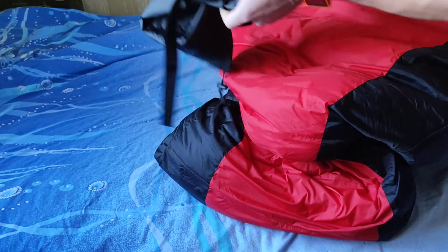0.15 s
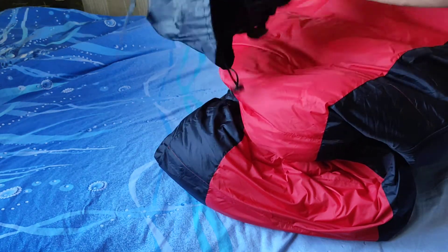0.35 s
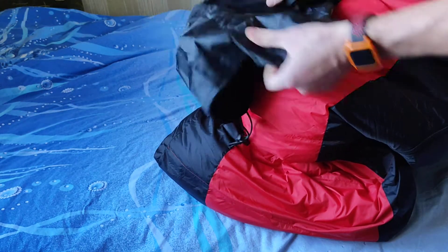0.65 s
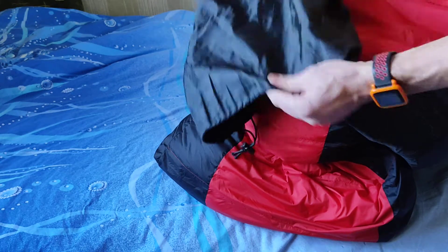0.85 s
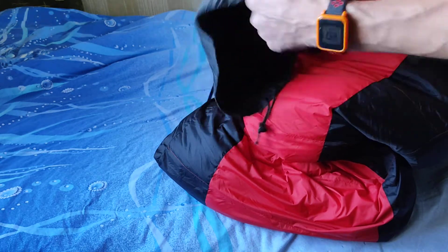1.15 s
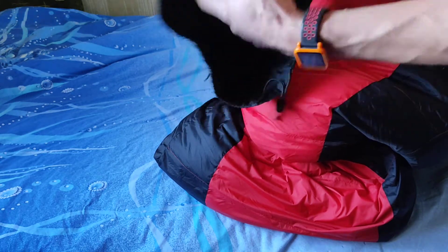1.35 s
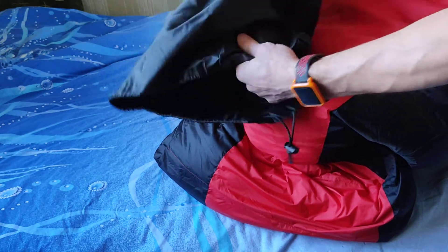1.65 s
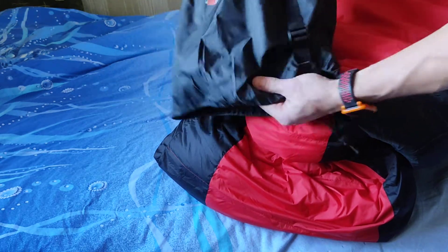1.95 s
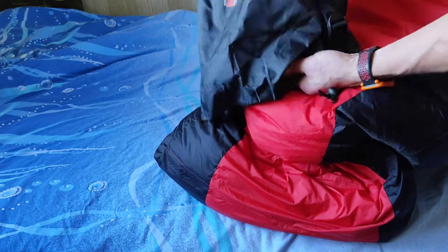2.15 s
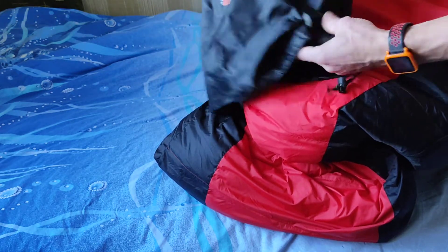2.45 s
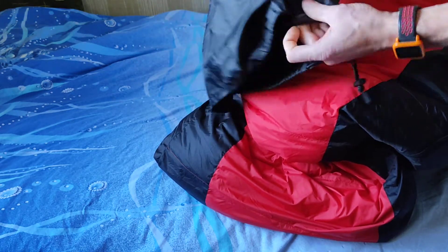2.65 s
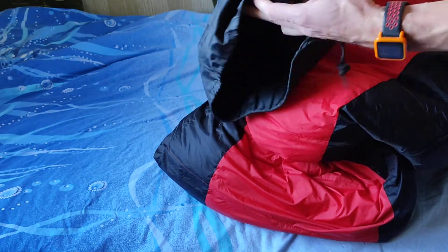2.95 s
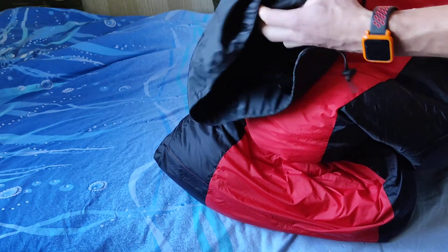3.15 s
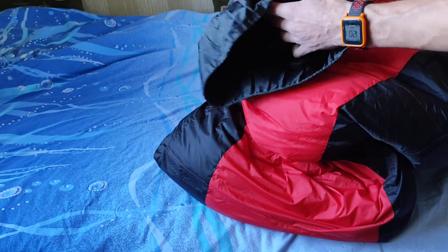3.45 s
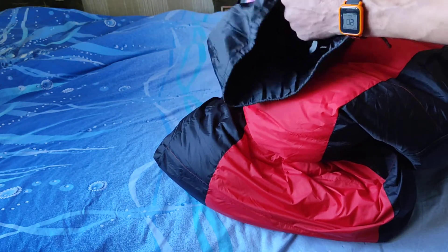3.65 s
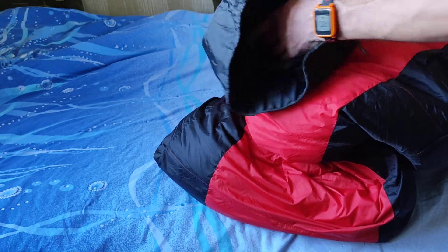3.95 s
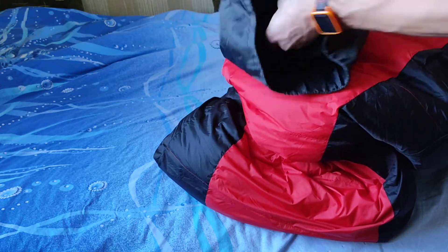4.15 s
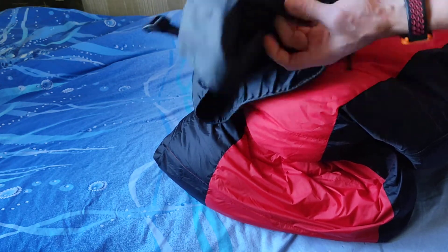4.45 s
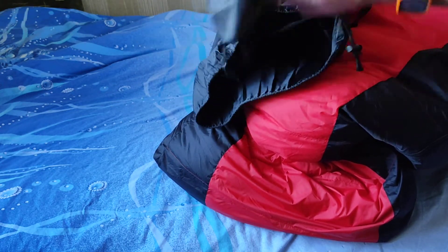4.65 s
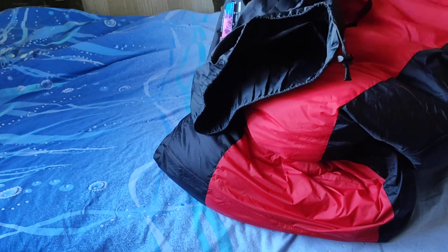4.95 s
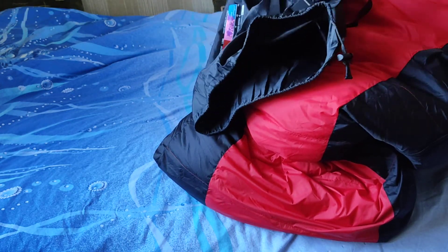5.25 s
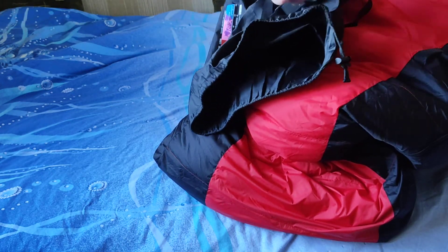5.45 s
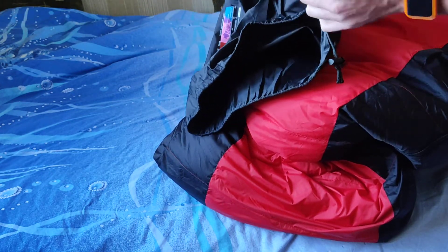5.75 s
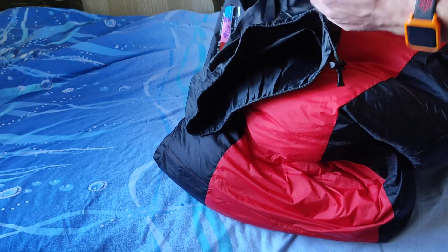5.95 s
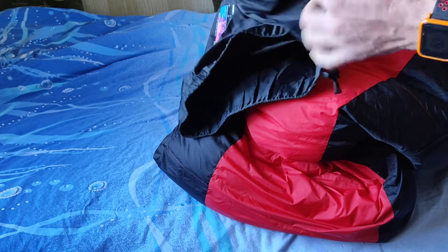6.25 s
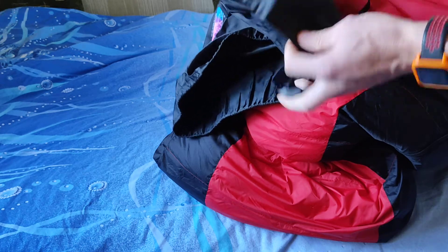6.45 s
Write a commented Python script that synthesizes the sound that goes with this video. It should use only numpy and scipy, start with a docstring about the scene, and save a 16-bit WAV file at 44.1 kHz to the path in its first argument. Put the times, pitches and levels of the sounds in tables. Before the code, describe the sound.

A nylon sack rustles and crinkles irregularly as hands turn and open it, with a few sharp swishes and snaps.

```python
"""A nylon sack rustles as hands turn and open it over a sleeping bag on a bed, near a two-port microphone.
Stick-slip friction makes the weave hiss, scrape and rip; creases buckle and crackle, slack panels flap,
and strained folds snap with a tick and a dull pop. The microphone port resonates near 8 kHz.
The soft room answers briefly, over faint air noise and a low rumble."""
import sys
import numpy as np
from scipy import signal
from scipy.fft import rfft, irfft, next_fast_len
from scipy.io import wavfile
from scipy.ndimage import uniform_filter1d

SR = 44100
rng = np.random.default_rng(int(sys.argv[2]) if len(sys.argv) > 2 else 0)


def generate_wav(signal):
    """Clip the signal to [-1, 1] and save it as 16-bit WAV at the path in sys.argv[1]."""
    frames = np.transpose(np.atleast_2d(signal))
    scaled = np.clip(frames, -1, 1) * 32767
    pcm = np.round(scaled).astype(np.int16)
    wavfile.write(sys.argv[1], SR, pcm)


N = 291060


def amp(db):
    return 10 ** (np.asarray(db) / 20)


def unit_rms(x):
    return x / np.sqrt(np.mean(x ** 2) + 1e-20)


def pan(left_minus_right_db):
    """Stereo level difference, split equally between the channels."""
    return amp(left_minus_right_db * np.array([[.5], [-.5]]))


def at_frequency(points, hz):
    knots_hz, values = np.transpose(points)
    return np.interp(np.log(hz + 1), np.log(knots_hz + 1), values)


def over_time(points):
    return np.interp(np.arange(N) / SR, *np.transpose(points))


def add_at(out, start_s, sound):
    span = out[:, round(start_s * SR):][:, :sound.shape[1]]
    span += sound[:, :span.shape[1]]


def colour(x, spectrum):
    """Minimum-phase filtering: the response is causal, so clicks ring after they land."""
    log_gain = np.log(amp(at_frequency(spectrum, abs(np.fft.fftfreq(8192, 1 / SR)))))
    taps = np.fft.ifft(np.exp(np.conj(signal.hilbert(log_gain)))).real[:4096]
    return signal.oaconvolve(x, taps[None], axes=1)[:, :N]


# Likeness of the two ports: (frequency [Hz], correlation [0-1])
PORT_CORRELATION = [(25, 0.16), (60, 0.35), (150, 0.97), (380, 0.93), (950, 0.62), (2380, 0.59),
                    (5980, 0.019), (15000, 0.0033)]
# Imbalance of the ports: (frequency [Hz], left minus right [dB])
PORT_BALANCE = [(60, -0.5), (180, 9), (550, 6.5), (1650, 4), (4200, 2), (6400, 1), (7400, -2.5),
                (8600, 6.5), (10000, 4), (15000, 2)]
def microphone_ports(streams):
    """Partial coherence: the ports agree most in the upper bass; in the treble each hears its own stream."""
    size = next_fast_len(N)
    hz = np.fft.rfftfreq(size, 1 / SR)
    correlation = np.clip(at_frequency(PORT_CORRELATION, hz), 0, 1)
    left, independent = rfft(streams, size)
    right = correlation * left + np.sqrt(1 - correlation ** 2) * independent
    return irfft(np.array([left, right]) * pan(at_frequency(PORT_BALANCE, hz)), size)[:, :N]


# Spectra of room air with microphone hiss, and of the rumble: (frequency [Hz], relative level [dB])
AIR_SPECTRUM = [(50, 8), (150, -5), (400, 3), (2000, 3), (5000, -22), (7700, 1), (10000, -26), (16000, -44)]
RUMBLE_SPECTRUM = [(15, -1.5), (27, -15.5), (60, -16.5), (100, -25.5), (200, -25), (16000, -100)]
# Swell of the rumble: (time [s], level [dB])
RUMBLE_LEVELS = [(0.0, -56.5), (0.8, -57.5), (1.8, -53.5), (2.0, -58), (2.4, -55), (3.5, -56), (4.2, -58),
                 (4.4, -56), (4.65, -56.5), (5.4, -58.5), (6.0, -57), (6.25, -57), (6.43, -49), (6.6, -54)]
def background():
    """Filtered Gaussian noise: steady room air and a wavering rumble, stronger on the left."""
    air_noise, rumble_noise = rng.standard_normal((2, 2, N))
    air = unit_rms(microphone_ports(colour(air_noise, AIR_SPECTRUM)))
    rumble = unit_rms(microphone_ports(colour(rumble_noise, RUMBLE_SPECTRUM)))
    return amp(-64.5) * air + amp(over_time(RUMBLE_LEVELS)) * pan(5) * rumble


def stick_slip(per_s, spread_db, hiss, clump_db, clump_s):
    """Stick-slip friction: uneven impulses over a hiss, in clumps; two uncorrelated streams of one motion."""
    chance, size, clumps = rng.random(N), rng.exponential(1, N), rng.standard_normal(N)
    sign, smooth = rng.standard_normal((2, 2, N))
    jumps = unit_rms((chance < per_s / SR) * amp(spread_db * np.minimum(size, 5)) * np.sign(sign))
    width = int(clump_s * SR)
    clumps = unit_rms(uniform_filter1d(uniform_filter1d(clumps, width), width))
    return (hiss * smooth + np.sqrt(1 - hiss ** 2) * jumps) * amp(clump_db * clumps)


def cloth_texture(spectrum, patch_db, **friction):
    """Spectral modulation: parts of the cloth sound in turn, so patches of the spectrum come and go."""
    bins = signal.stft(colour(stick_slip(**friction), spectrum), nperseg=512)[2]
    patches = uniform_filter1d(rng.standard_normal(bins.shape[1:]), 6, axis=0)
    patches = unit_rms(uniform_filter1d(patches, 8, axis=1))
    return unit_rms(signal.istft(bins * amp(patch_db * patches), nperseg=512)[1][:, :N])


# Pulls of the hands: (peak time [s], weave level [dB], crease level [dB], 10 dB rise [ms], 10 dB fall [ms])
HAND_PULLS = [(0.06, -34.5, -43.5, 118, 121), (0.251, -38.5, -49.5, 58, 52), (0.496, -36.5, -47.5, 155, 66),
              (0.604, -36, -50.5, 56, 92.0), (0.672, -42.5, -48, 31, 119.0), (0.768, -32, -65, 35, 26),
              (0.881, -27.5, -40.5, 141, 46), (1.057, -35.5, -49, 131, 119), (1.152, -36, -49, 7, 30),
              (1.178, -36.5, -43, 18, 119), (1.466, -39, -49, 293, 182), (1.762, -44, -49, 296.0, 128.0),
              (1.815, -26.5, -37, 115, 125), (2.178, -39.5, -47.5, 238, 133), (2.4, -48, -63, 108, 5),
              (2.535, -40, -57, 127.0, 56.0), (2.646, -38, -52.5, 26, 25), (2.775, -45.0, -51.5, 162.0, 94),
              (2.929, -38, -48, 134, 44), (3.054, -38, -54.5, 72, 63), (3.16, -40, -53, 50, 32),
              (3.25, -34.0, -67.0, 73, 43), (3.342, -35, -48.5, 44, 177.0), (3.44, -32.5, -48.5, 42, 203),
              (3.582, -34, -54, 21, 13), (3.694, -30, -46, 43, 44), (3.859, -33.5, -46, 114, 66),
              (3.988, -29.5, -60, 41, 76), (4.175, -33, -50.5, 128, 9), (4.23, -33, -54, 71, 95.0),
              (4.284, -35, -45, 27, 131), (4.435, -34.5, -47, 56, 44), (4.542, -38, -68, 2, 31),
              (4.667, -41.5, -53, 126, 70), (4.774, -40.5, -54.5, 6, 70), (4.881, -39.5, -58, 29, 50),
              (4.952, -41, -61, 3, 126), (5.085, -41.5, -52, 40, 0), (5.108, -30, -48.5, 15, 44),
              (5.19, -44, -65, 3, 28), (5.275, -45, -69, 56, 36), (5.335, -42, -69, 57, 28),
              (5.447, -39.5, -49.5, 90.0, 28), (5.513, -40, -46.5, 68, 43), (5.599, -41.5, -61, 69, 69),
              (5.729, -41, -54.5, 96.0, 59), (5.777, -44, -74, 18, 227), (6.005, -37.5, -46.5, 36, 18),
              (6.07, -29.5, -34.5, 50, 33), (6.22, -45.5, -56, 101, 196.0),
              (6.545, -40.5, -74, 121.5, 69.0)]
# Slack cloth folding over:
# (peak time [s], crease level [dB], fold level [dB], panel level [dB], 10 dB half-width [ms])
SLACK_FLAPS = [(0.01, -44, -51, -53, 30), (0.07, -43, -43, -52, 28), (0.205, -50.5, -54, -53, 33),
               (0.481, -70.0, -52, -46.5, 26), (0.563, -47, -55, -51.5, 33), (0.673, -44.5, -45, -46.5, 36),
               (0.801, -38.5, -44, -41.5, 49), (1.029, -50, -50, -52, 18), (1.188, -39.5, -43, -40, 22),
               (1.228, -39.5, -54, -43, 17), (1.343, -68, -62, -65, 41), (1.44, -51, -47, -48, 18),
               (1.64, -49.5, -45.5, -46.5, 96), (1.745, -35, -39, -45, 28), (1.807, -33.5, -31.5, -47, 16),
               (1.87, -39, -43, -44, 22), (2.226, -53, -50.5, -52.5, 91), (2.378, -48.5, -57, -59, 44),
               (2.507, -45.5, -50.5, -51.5, 91), (2.905, -46, -70.0, -60, 59), (3.109, -56, -51, -50.5, 27),
               (3.246, -46.5, -50, -54, 68), (3.52, -42.5, -77, -53.5, 75), (3.609, -60, -51.5, -63, 97.0),
               (3.704, -39, -51.5, -50, 48), (3.929, -45.5, -46.5, -56, 26), (4.038, -42, -45, -51.5, 91),
               (4.168, -45, -46, -58, 45), (4.255, -40.5, -48, -70.0, 44), (4.55, -47, -66, -72, 5.5),
               (4.697, -47, -59, -56, 55), (4.817, -51, -55, -58, 20), (4.887, -51, -52.5, -56, 46),
               (5.002, -49.5, -54.5, -54.5, 57), (5.1, -64, -51.5, -61, 64), (5.277, -51.5, -56.5, -56, 34),
               (5.338, -47, -50, -60, 24), (5.446, -44, -78, -74, 41), (5.63, -46.5, -51, -59, 62),
               (5.884, -50.5, -54.5, -62, 147), (6.04, -52, -49, -40, 9), (6.08, -49, -46, -40.5, 18),
               (6.267, -59, -48, -57.5, 16), (6.468, -59.5, -60.5, -60, 115), (6.577, -63, -53, -56, 39)]
def cloth_envelopes():
    """Incoherent addition: pulls and flaps sum in power to drive the weave, creases, folds and panels."""
    ms = np.arange(0, N + 64, 64) * 1000 / SR
    peak_s, *pull_levels, rise_ms, fall_ms = np.transpose(HAND_PULLS)[:, :, None]
    lag_ms = ms - 1000 * peak_s
    slope_ms = np.maximum(np.where(lag_ms < 0, rise_ms, fall_ms), 2)
    pull = amp(-10 * (abs(lag_ms) / slope_ms) ** 1.24)  # exponent: 1 is pointed, 2 is round
    weave, pulled = (np.sum((amp(db) * pull) ** 2, axis=0) for db in pull_levels)
    peak_s, *flap_levels, width_ms = np.transpose(SLACK_FLAPS)[:, :, None]
    flap = amp(-10 * ((ms - 1000 * peak_s) / width_ms) ** 2)
    crease, fold, panel = (np.sum((amp(db) * flap) ** 2, axis=0) for db in flap_levels)
    # Pulled creases carry the folds and panels along.
    powers = weave, crease + pulled, fold + pulled * amp(-1) ** 2, panel + pulled * amp(-7) ** 2
    return [np.interp(np.arange(N) * 1000 / SR, ms, np.sqrt(power)) for power in powers]


# Spectra of sliding weave, small creases, large folds and panels: (frequency [Hz], relative level [dB])
WEAVE_SPECTRUM = [(800, -26.5), (2000, -19), (4400, -16), (6300, -12.5), (7700, -1.5), (8800, -5.5),
                  (9500, -17), (10400, -25.5), (15200, -31.5), (16300, -76)]
CREASE_SPECTRUM = [(500, -22.5), (1200, -3.5), (1800, -1.5), (2800, 0), (4500, -11), (7700, -1),
                   (10000, -41), (16000, -42)]
FOLD_SPECTRUM = [(150, -29.5), (400, -5), (650, -0.5), (1200, -1.5), (2000, -7), (4500, -21), (16000, -76)]
PANEL_SPECTRUM = [(50, -24), (110, -16), (145, -5.5), (190, -4), (230, -2), (300, -5), (420, -7),
                  (800, -18), (2000, -34), (16000, -72)]
# Where the hands work: (time [s], left minus right [dB])
HAND_POSITION = [(0.0, -3), (5.0, -2.5), (5.9, -2.5), (6.25, -2), (6.6, 2)]
def rustle():
    """Friction and buckling at four scales: the larger the moving part, the lower its spectrum."""
    textures = (
        cloth_texture(WEAVE_SPECTRUM, patch_db=2.95,
                      per_s=5000, spread_db=0.82, hiss=0.98, clump_db=0.89, clump_s=0.012),
        cloth_texture(CREASE_SPECTRUM, patch_db=2.9,
                      per_s=1000, spread_db=2.56, hiss=0.78, clump_db=1.5, clump_s=0.014),
        cloth_texture(FOLD_SPECTRUM, patch_db=1.5,
                      per_s=700, spread_db=3.6, hiss=0.8, clump_db=1.44, clump_s=0.0075),
        cloth_texture(PANEL_SPECTRUM, patch_db=1.2,
                      per_s=400, spread_db=2.0, hiss=0.85, clump_db=1.2, clump_s=0.02))
    cloth = sum(envelope * texture for envelope, texture in zip(cloth_envelopes(), textures))
    return microphone_ports(cloth) * pan(over_time(HAND_POSITION))


# A sharp tick through the resonant port: (frequency [Hz], relative level [dB])
TICK_SPECTRUM = [(800, -34), (2300, -19), (4300, -14.5), (5600, 1), (6900, 11.5), (8500, 9.5), (10500, -14),
                 (12000, -25), (14000, -18), (16000, -28)]
# Snapping folds: (time [s], tick level [dB], pop level [dB], panel frequency [Hz], left minus right [dB])
FOLD_SNAPS = [(0.031, -35.5, -24, 1460, -3), (0.213, -48, -44, 1500, 1), (0.406, -46, -34.5, 890, 4),
              (0.757, -20.5, -40, 958, -6), (1.1491, -25, -28, 1610, 0), (1.175, -27, -24, 1930, -3),
              (1.185, -38, -28, 1350, 5), (1.335, -46, -35.5, 1170, 1), (1.712, -23, -33, 417, 5),
              (1.754, -25, -28.5, 544, 1), (1.791, -23, -19, 2800, 1), (1.857, -23, -24, 2000, 1),
              (2.929, -37, -34, 2500, 3), (3.103, -45, -41, 625, 1), (3.326, -32, -33, 3400, -1.0),
              (3.7, -31, -29, 1930, -1), (3.82, -39, -34, 2970, -1.5), (4.021, -38, -38, 1080, 0),
              (4.411, -35, -39, 1110, 1), (4.538, -36, -37, 2920, 3), (4.773, -27, -42, 2860, 2),
              (4.951, -28, -35, 2120, 2), (5.001, -45, -31.5, 2470, 3), (5.096, -8, -38, 3600, -7),
              (5.106, -17, -34, 2990, -8), (5.186, -27, -48, 1290, -3), (5.324, -34, -40, 1470, -1),
              (5.427, -46, -39, 1520, -1), (5.594, -23, -28, 1760, -1), (5.7, -38, -45, 1700, 0),
              (6.0292, -30, -24.5, 2500, 2), (6.053, -40, -31, 1550, 2), (6.059, -42, -12, 1560, 3),
              (6.067, -30, -28, 2200, 0), (6.544, -40, -60, 600, 4), (6.568, -43, -43, 422, 9)]
def snaps():
    """Snap-through buckling: a fold gives way, ringing the port and a damped panel mode, then crackles."""
    out, t = np.zeros((2, N)), np.arange(2000) / SR
    lag = t - 0.0014  # the fold strains, then lets go at lag zero
    strain = np.where(lag < 0, np.exp(-(lag / 0.0006) ** 2), np.exp(-lag / 0.0008))
    ring_t60_cycles, crackle_t60_s = 13, 0.021
    for start_s, tick_db, pop_db, panel_hz, pan_db in FOLD_SNAPS:
        noise = rng.standard_normal((4, len(t)))
        release = noise[2:] * strain
        release[:, np.argmin(abs(lag))] += [2.2, 6]  # impulses for the tick and the crack
        tick = colour(release, TICK_SPECTRUM)[0, :len(t)]
        crack = colour(release, CREASE_SPECTRUM)[1, :len(t)]
        cycles = panel_hz * np.maximum(lag + 0.00042, 0)
        ring = np.sin(2 * np.pi * cycles) * np.minimum(cycles / 0.65, 1)
        ring *= amp(-60 * cycles / ring_t60_cycles)
        pop = ring / abs(ring).max() + 0.32 * crack / abs(crack).max()
        snap = amp(tick_db) * tick / abs(tick).max() + amp(pop_db) * pop
        scatter = noise[:2] * amp(-25 - 60 * t / crackle_t60_s)
        crackle = signal.fftconvolve(scatter, snap[None], axes=1)[:, :len(t)]
        add_at(out, start_s, pan(pan_db) * (snap + crackle))
    return out


def slip_envelope(t, rise_s, decay_ms):
    """Transient sliding: an exponential onset under a Gaussian decay."""
    return (1 - np.exp(-t / rise_s)) * np.exp(-(t * 1000 / decay_ms) ** 2)


# Cloth scraping on cloth:
# (time [s], level before envelope [dB], decay [ms], centre frequency [Hz], left minus right [dB])
CLOTH_SCRAPES = [(0.032, -25, 2.5, 2200, 8), (0.058, -41, 21, 690, 1), (0.068, -39.5, 20, 1490, 1),
                 (0.406, -38, 4.5, 2400, -1), (0.467, -34.5, 4.8, 600, 4), (0.475, -44.5, 16, 296, 0),
                 (0.667, -37, 10, 1600, 1), (0.688, -43, 5.5, 450, 4), (0.764, -35, 5.9, 920, 4),
                 (0.779, -32, 9, 830, 1), (0.8, -33.5, 13, 1490, 1), (0.823, -35, 12, 1990, 1),
                 (1.174, -32, 6.5, 1300, 4), (1.192, -41, 4.8, 1210, 2), (1.149, -29, 3.2, 1990, 0),
                 (1.149, -30.5, 4.5, 590, 5), (1.167, -41, 2.8, 1500, 0), (1.222, -37, 8.1, 300, 4),
                 (1.43, -45, 16, 520, 3), (1.567, -40, 11, 300, 4), (1.71, -42.5, 35, 211, 4),
                 (1.733, -44, 8.2, 400, 3), (1.794, -42, 12, 350, 2), (1.79, -28, 4.7, 1400, 0),
                 (1.812, -35, 7.6, 1200, 2), (1.824, -29, 8.4, 1980, 1), (1.859, -28, 7, 646, 0),
                 (2.189, -45.5, 30, 1210, 3), (2.521, -50, 15, 400, 2), (3.105, -37.5, 8.7, 500, 3),
                 (3.675, -43.5, 7.1, 3000, -3), (3.922, -35, 4.2, 2200, 2), (3.952, -38, 26, 5000, -2),
                 (4.145, -38.5, 42, 5840, -2), (4.138, -38.5, 17, 2880, 0), (4.255, -45, 12, 3100, 0),
                 (4.282, -38, 16, 5000, 2), (4.862, -60, 14, 1200, 5), (4.961, -37, 11, 7640, 1),
                 (4.98, -40.5, 6, 1100, 9), (5.095, -27, 4.2, 11200, -2), (5.1, -37, 12.6, 816, 1),
                 (5.103, -32, 11, 5250, -1), (5.269, -50.5, 8.8, 500, 8), (5.324, -39, 4.9, 2200, -3.5),
                 (5.423, -43.5, 44, 1800, 4), (5.7, -39.5, 9, 4500, -2), (5.93, -46, 8, 700, 9),
                 (5.972, -40, 12, 880, 7.5), (6.027, -33, 5, 2480, 0), (6.031, -25, 6.5, 750, 16),
                 (6.042, -31.5, 11, 686, 7), (6.058, -28, 4.4, 2580, -1), (6.0595, -19, 3.1, 520, 9),
                 (6.067, -33, 7.3, 2500, 4)]
def scrapes():
    """Band-limited friction noise: each brief slip has its own pitch, and random modulation adds grit."""
    out, t = np.zeros((2, N)), np.arange(3000) / SR
    half_band_octaves, grit_db = 0.28, 2.5
    for start_s, level_db, decay_ms, centre_hz, pan_db in CLOTH_SCRAPES:
        noise = rng.standard_normal((3, len(t)))
        shared, separate = noise[0], noise[1:]
        grit = (shared + 0.72 * separate) * amp(grit_db * unit_rms(uniform_filter1d(shared, 60)))
        edges_hz = centre_hz * 2 ** (half_band_octaves * np.array([-1, 1]))
        band = signal.butter(2, edges_hz, "band", fs=SR, output="sos")
        scrape = unit_rms(signal.sosfilt(band, grit)) * slip_envelope(t, 0.0024, decay_ms)
        add_at(out, start_s, amp(level_db) * pan(pan_db) * scrape)
    return out


# Taut cloth pulled across itself: (time [s], peak level [dB], decay [ms], left minus right [dB])
TAUT_RIPS = [(1.149, -29, 4.5, 1), (1.154, -35, 4, -2), (3.952, -23, 7.4, -1), (3.973, -22, 4, -1),
             (3.979, -22, 5.6, -1), (3.9838, -10.5, 9.6, 0), (4.777, -34, 5, -6), (5.103, -24, 2.5, -3),
             (5.1075, -21, 2.2, -4), (6.053, -24, 2.3, -3), (6.066, -21, 5.3, 1)]
def rips():
    """Noise-excited resonance: a burst of fast slips takes on the bright colour of the ticks."""
    out, t = np.zeros((2, N)), np.arange(2000) / SR
    for start_s, peak_db, decay_ms, pan_db in TAUT_RIPS:
        burst = rng.standard_normal((2, len(t))) * slip_envelope(t, 0.0008, decay_ms)
        rip = colour(burst, TICK_SPECTRUM)[:, :len(t)]
        add_at(out, start_s, amp(peak_db) * pan(pan_db) * rip / abs(rip).max())
    return out


# Decay of the soft room: (frequency [Hz], reverberation time [s])
ROOM_T60 = [(200, 0.063), (1000, 0.15), (4000, 0.075), (10000, 0.066)]
def reverberation(direct):
    """Absorption: sparse random reflections decay exponentially, at a rate set by frequency."""
    shape, delay_samples = (2, int(0.53 * SR)), 250
    reflections = rng.choice([-1., 1.], shape) * (rng.random(shape) < 0.1)
    hz, t, bins = signal.stft(reflections, SR, nperseg=128)
    decay = amp(-60 * t / at_frequency(ROOM_T60, hz)[:, None])
    tail = signal.istft(bins * decay, SR, nperseg=128)[1]
    tail /= np.linalg.norm(tail, axis=1, keepdims=True)
    return signal.fftconvolve(direct, np.pad(tail, ((0, 0), (delay_samples, 0))), axes=1)[:, :N]


def scene():
    """Superposition of the direct cloth sound, its reverberation and the background."""
    direct = rustle() + snaps() + rips() + scrapes()
    return direct + amp(-10.5) * reverberation(direct) + background()


def record(dry):
    """Band limiting: a linear-phase low-pass filter removes the highest treble."""
    cutoff_hz = 16750
    lowpass = signal.firwin(511, cutoff_hz, window=("kaiser", 9), fs=SR)
    return signal.oaconvolve(dry, lowpass[None], "same")


dry = scene()
out = record(dry)
generate_wav(out)
```